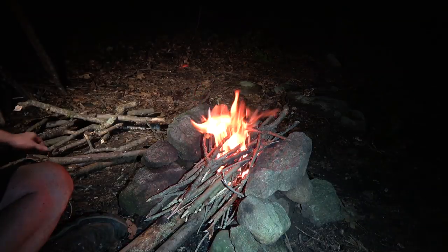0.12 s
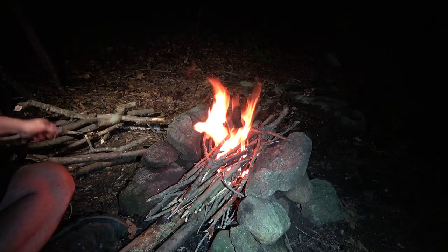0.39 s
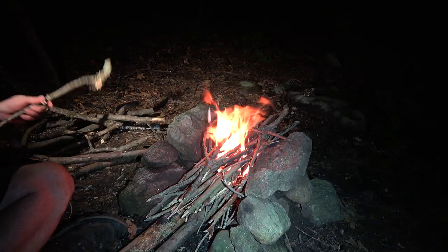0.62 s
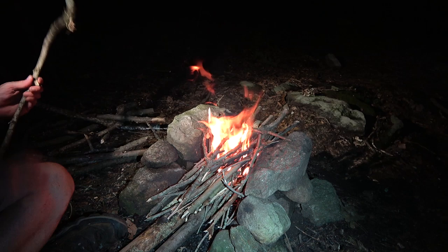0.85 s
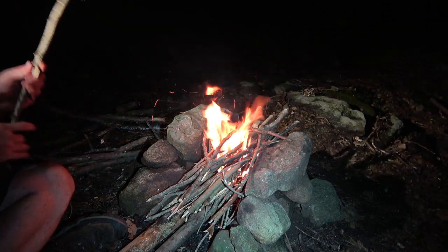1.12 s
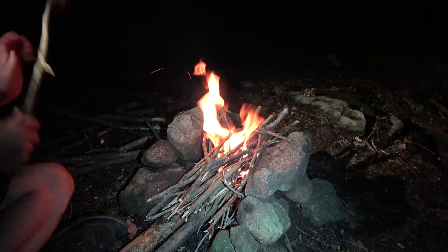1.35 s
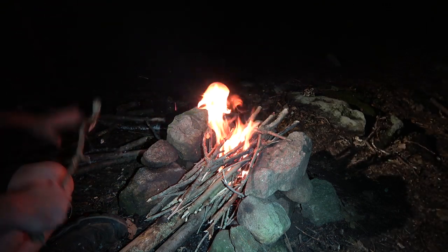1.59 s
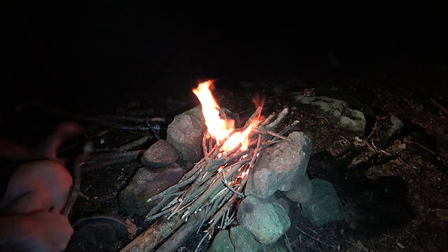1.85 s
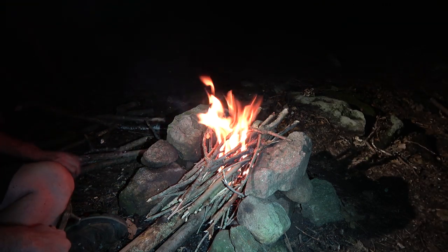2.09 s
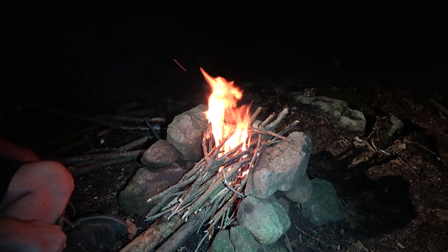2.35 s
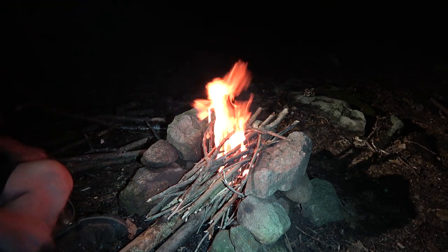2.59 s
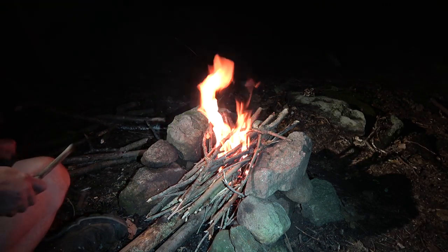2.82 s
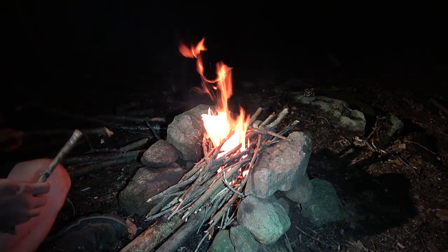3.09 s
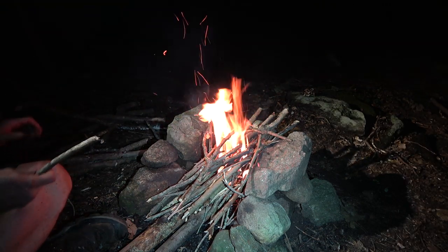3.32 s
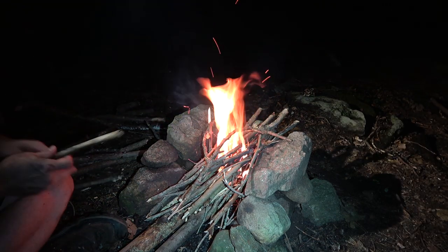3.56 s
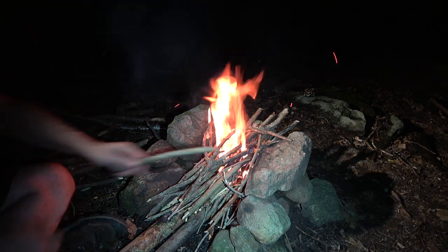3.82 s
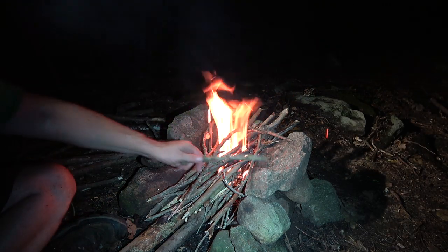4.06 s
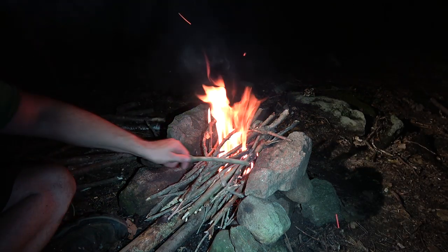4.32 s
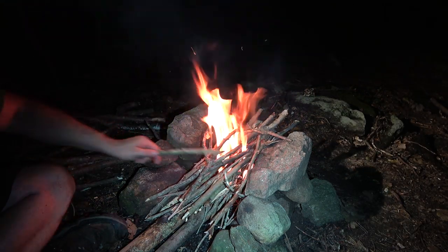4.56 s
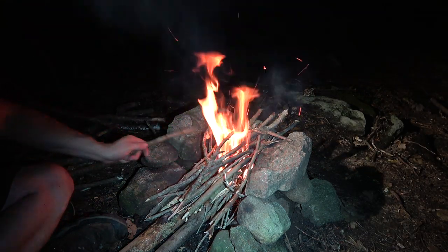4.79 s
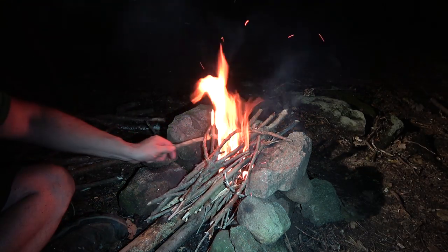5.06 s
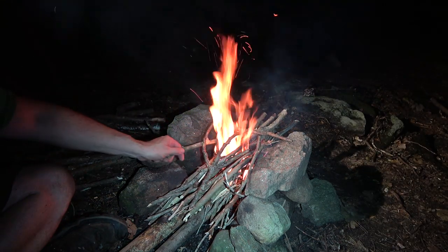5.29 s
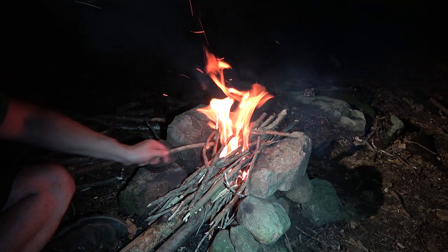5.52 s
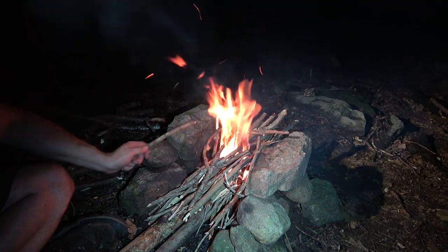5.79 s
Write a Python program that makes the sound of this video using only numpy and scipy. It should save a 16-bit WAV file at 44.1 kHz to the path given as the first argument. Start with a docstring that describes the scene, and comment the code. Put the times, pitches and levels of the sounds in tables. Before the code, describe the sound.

A small campfire of dry twigs outdoors among trees at night, heard close in mono. Throughout, flames make a very quiet, uneven low rumble under faint steady hiss, with sparse tiny ember ticks. Light rustle at 0.35-0.45 s and soft knocks precede a strong, bright pop at 0.84 s. Barely audible short chirps and a brush of twigs come around 1.15 s, then it is almost still. Small ticks and a scrape at 2.3-2.4 s lead to the dominating event at 2.65 s: a stick broken by hand, an explosive dry crack with a low thump, a woody knock at 2.73 s and a bright diffuse echo from the trees fading over half a second. A thin high snap follows at 3.04 s, a weaker one at 3.27 s, a dull knock at 3.36 s. From 4.2 to 5.5 s faint crackles and dry rustles cluster as the stick pokes the fire. A duller, moderate pop with a knock closes at 5.87 s.

```python
"""Dry twigs burst with sharp pops in a small fire, outdoors among trees at night: each is a pressure step
and a burst of splitting fibres, scattered by a ring of stones and echoed by the trees as decaying noise.
Sticks knock beside the fire as puffs of low noise; twigs and leaves rustle as clumped tiny clicks.
There are a few short tone chirps; the flames rumble as uneven low noise over the steady hiss of the night."""
import sys
import numpy as np
from scipy import signal
from scipy.fft import rfft, irfft
from scipy.io import wavfile

SR = 44100
rng = np.random.default_rng(int(sys.argv[2]) if len(sys.argv) > 2 else 0)


def materialize(psi):
    """Save the field psi as 16-bit PCM at rate SR to the path in sys.argv[1].

    A 1-D psi becomes a single channel; in a 2-D psi each row is a channel.
    """
    bounded = np.clip(np.atleast_2d(psi).T, -1, 1)
    quanta = np.round(bounded * 32767).astype(np.int16)
    wavfile.write(sys.argv[1], SR, quanta)


def nominal_scale(level):
    """Amplitude ratio for a level in decibels (scalar or array-like)."""
    x = np.asarray(level, float) / 20
    return 10 ** x


N = 260631

# Pops and snaps of bursting twigs. Each row: start in seconds, level in dB per half octave at the
# strongest frequency (energy referred to 6 ms), that frequency in Hz, fall below it in dB/octave,
# fall above it in dB/octave.
POP_EVENTS = [(0.3377, -72.5, 5920.0, 9, 4), (0.5705, -74, 9280.0, 15.0, 15.0), (0.8364, -28, 5760, 6.5, 6),
              (1.083, -67.5, 9280.0, 3, 7), (2.0366, -57.5, 7410.0, 3.5, -2), (2.2424, -69, 1540.0, 0, 2.5),
              (2.3067, -59, 5900, 7, 13.5), (2.3369, -59, 5920.0, 1, 9.0), (2.3744, -58.1, 1710, 11, 7),
              (2.5986, -65.5, 2410.0, 3.5, 2), (2.6084, -68.5, 7410.0, 0.5, 5.5),
              (2.6455, -13, 5080, 6, 6.0), (2.918, -56.5, 3380.0, 5.5, 2.5), (3.041, -31.4, 9350, 4, 12.5),
              (3.2653, -43.5, 8290.0, 5.5, 6.5), (3.356, -53, 507, 2, 2), (3.478, -70.5, 13000.0, 1, 7),
              (3.7547, -71.5, 13000.0, 12.0, 6.0), (4.195, -69.5, 2400, 17.5, 2.5),
              (4.3074, -58, 7450, 11, 32), (4.3633, -69, 5000, 4, 2), (4.3705, -62, 8290.0, 11, 0),
              (4.4767, -54.5, 13000.0, 6, -2), (4.5837, -73, 8980, 9, 4), (4.6164, -47.5, 7410.0, 2, 6.0),
              (4.735, -70.5, 12000, 5, 1), (4.911, -75, 9000, 7.5, 3), (4.97, -73, 6000, 2.5, 5),
              (4.9841, -59, 1927, 11, 2.5), (5.0162, -71, 6000, 7, 5), (5.0241, -59.6, 3380.0, 7.5, 3),
              (5.0302, -62, 3020.0, 12, 4.5), (5.0699, -57, 2150.0, 4.5, 6.5),
              (5.0908, -60.5, 2410.0, 8, -0.5), (5.1026, -65, 8400, 5.5, 9), (5.1071, -53.5, 8250, 7, 5),
              (5.1618, -55.5, 10380.0, 5, 13.5), (5.2734, -71.4, 3010, 8, 0.5),
              (5.358, -68.5, 11650, 5.5, 5), (5.7149, -65, 4730.0, 10, 0.5), (5.8726, -43, 2424, 9, 5.5)]


def pops(top_fall_db=2.5, stones_db=-16, stones_t60=0.071, boom_db=-1.0, boom_t60=0.052,
         fall_db=17.5, shelter_db=-8):
    """Impulsive fracture: a pressure step, fibres splitting for a few ms, then scatter from stones and ground.
    Also gives the bare strength of each pop, which wakes the echo."""
    out, strength, size = np.zeros(N), np.zeros(N), 4096
    step_height, split_ms, split_t60 = 4.2, 1.6, 0.007   # t60 in seconds
    rows = np.vstack([POP_EVENTS, ticks()])
    t = np.arange(size) / SR
    level, loudest = rows[:, 1:2], rows[:, 1].max()
    noise = rng.standard_normal((len(rows), size))

    # the fibres split evenly at first, then die away
    push = noise * nominal_scale(-60 * np.maximum(t - split_ms / 1000, 0) / split_t60)
    # strong ones start with a step; faint or dull ones scrape in
    sharp = np.clip((level + 68) / 18, 0, 1) * (rows[:, 2:3] > 1000)
    push[:, :3] = np.array([-1, 2, 1]) * step_height * sharp
    # stones scatter only short waves, and the broken stick scatters most
    scatter_db = stones_db - 5.4 * (level < loudest)
    push += band(noise, 1500, 18000) * nominal_scale(scatter_db - 60 * t / stones_t60)
    # the lows ring on in the pile
    push += band(noise[:, ::-1], 60, 600) * nominal_scale(boom_db - 60 * t / boom_t60)

    hz = np.maximum(np.fft.rfftfreq(size, 1 / SR), 1)
    edges = 64 * 2 ** np.arange(0, 8.5, 0.5)   # half octaves
    centres = np.sqrt(edges[1:] * edges[:-1])
    for (s, top_db, top_hz, below_db, above_db), burst in zip(rows, rfft(push)):
        power = [np.sum(np.abs(burst[(hz >= a) & (hz < b)]) ** 2) for a, b in zip(edges, edges[1:])]
        have_db = 10 * np.log10(np.array(power) * 2 / size / (0.006 * SR))
        octaves = np.log2(centres / top_hz)
        want_db = top_db - np.where(octaves < 0, -below_db, above_db) * octaves
        bright = nominal_scale(want_db[(centres > 2000) & (centres < 8000)]).mean(keepdims=True) * 2
        # small twigs push little bass
        want_db -= fall_db * np.maximum(np.log2(350 / centres), 0)
        want_db -= top_fall_db * np.maximum(np.log2(centres / 11000), 0)
        gain = nominal_scale(np.interp(np.log(hz), np.log(centres), want_db - have_db))
        add(out, s, irfft(burst * causal(gain)))
        # the loudest is a stick broken by hand in the open; the stones shelter the rest from the trees
        add(strength, s, bright * nominal_scale(shelter_db * (top_db < loudest)))
    return port(out), strength


def ticks(low_hz=5000, high_hz=13000, fall_db=4.5):
    """A random point process: rows like those of the pops for thin, faint ticks of the embers."""
    per_s, least_db, spread_db = 1.7, -73, 0.5
    when, size, pitch = rng.random((round(per_s * N / SR), 3)).T
    level = least_db - spread_db * np.log(1 - 0.95 * size)
    top_hz = low_hz * (high_hz / low_hz) ** pitch
    return np.c_[when * N / SR, level, top_hz, np.full((len(when), 2), fall_db)]


# Echo from the trees. Each row: frequency in Hz, level in dB relative to the pop, t60 in seconds.
TREE_ECHO = [(400, -47, .5), (1000, -41.5, 0.24), (2270, -33.5, 0.92), (3470, -23, 0.49),
             (5500, -25.5, 0.75), (7933, -25, 0.47), (13000, -28.5, .6)]


def trees(x, onset_s=0.0054):
    """Diffuse reverberation: many scattered echoes make noise that dies away at a rate set band by band."""
    t = np.arange(round(0.8 * SR)) / SR
    edges = 280 * 2 ** np.arange(0, 6, 0.5)
    white, echo = rng.standard_normal((2, len(t))), 0
    for k, (low, high) in enumerate(zip(edges, edges[1:])):
        db, t60 = at_hz(TREE_ECHO, np.sqrt(low * high))
        echo = echo + nominal_scale(db - 60 * t / t60) * band(white[k % 2], low, high)
    return signal.fftconvolve(x, echo * (1 - np.exp(-t / onset_s)))[:N]


# Resonances of the microphone's port. Each row: frequency in Hz, width in Hz, gain in dB.
PORT_RESONANCES = [(5510, 1200, 2.0), (9100, 2000, 5), (10700, 2800, -5), (12754, 2500, 1)]


def port(x):
    """Cavity resonance: the port of the microphone colours the sound with peaks and a dip."""
    return peaks(x, PORT_RESONANCES)


# Dull knocks of sticks on the ground and in the pile. Each row: start in seconds, peak of the low part
# in dB, peak of the grit in dB relative to it, time constant of the fall in ms.
KNOCK_EVENTS = [(0.589, -57, -21, 6.5), (0.733, -58.5, -14, 5.9), (0.85, -59, -20, 14),
                (1.29, -58, -18.5, 6.8), (1.902, -56.5, -10, 32), (2.344, -52.5, 0, 13),
                (2.379, -59.5, 4, 25), (2.647, -26, -26, 4.4), (2.727, -35, -3, 12), (2.753, -53.5, 8, 7.4),
                (3.044, -50.5, -14, 9), (3.355, -40, -5.5, 12.5), (3.384, -56, -13, 13),
                (3.489, -56.5, -7.5, 9.6), (3.564, -52, -18, 8), (3.637, -51.5, -15, 6.6),
                (4.945, -56.5, -2, 6.4), (4.961, -62, -16.5, 8.8), (5.096, -56.5, -1, 10),
                (5.325, -65, -6.5, 14), (5.873, -42.5, -15, 3)]


def knocks():
    """Soft impact: a yielding contact gives a short puff of low noise with a little grit above."""
    out, t = np.zeros(N), np.arange(round(0.08 * SR)) / SR
    noises = rng.standard_normal((len(KNOCK_EVENTS), len(t)))
    for (s, peak_db, grit_db, fall_ms), noise in zip(KNOCK_EVENTS, noises):
        puff = noise * (1 - np.exp(-t / 0.001)) * np.exp(-t * 1000 / max(fall_ms, 1))
        low = band(band(puff, 230, 900), 230, 600)
        grit = band(puff * np.exp(-t / 0.024), 1000, 1550)
        knock = low / np.abs(low).max() + nominal_scale(grit_db) * grit / np.abs(grit).max()
        add(out, s, nominal_scale(peak_db) * knock)
    return out


# Brief pitched chirps. Each row: start in seconds, frequency in Hz, peak level in dB, length in ms.
CHIRP_EVENTS = [(1.141, 2110, -62, 9.1), (1.161, 5900, -58, 7.3), (1.181, 5900, -56, 8.0),
                (1.312, 2320, -68, 22.0), (4.749, 3310, -57, 4.9)]


def chirps():
    """Windowed sinusoids: short tone bursts of steady pitch that swell and fade smoothly."""
    out = np.zeros(N)
    for s, hz, db, length_ms in CHIRP_EVENTS:
        t = np.arange(round(length_ms * SR / 1000)) / SR
        add(out, s, nominal_scale(db) * np.hanning(len(t)) * np.sin(2 * np.pi * hz * t))
    return out


# Strokes of twigs and leaves rubbing. Each row: time of the peak in seconds, nominal level in dB,
# swell in dB/s, fade in dB/s, centre of the scrape in Hz.
RUSTLE_STROKES = [(0.345, -72, 100, 600, 5000), (0.41, -68.5, 350, 182, 5200), (1.155, -66, 400, 255, 5850),
                  (1.76, -70, 57, 80, 2080), (2.344, -60.5, 1200, 1500, 3260), (2.383, -62, 157, 278, 3896),
                  (3.377, -60.5, 1500, 700, 3300), (4.25, -79, 900, 100, 6000),
                  (4.297, -56.5, 302, 350, 5440), (4.335, -71, 399.5, 499, 7400),
                  (4.375, -64, 703.5, 173, 8000), (4.425, -83, 300.5, 302, 7000),
                  (4.46, -61, 700, 500, 5600), (4.526, -72, 150, 499.5, 6800),
                  (4.59, -73.5, 500, 500, 6200), (4.952, -75, 200, 898, 4800),
                  (4.992, -60.5, 800, 900, 5100), (5.026, -86, 400, 800, 5580),
                  (5.112, -66, 700, 900, 6180), (5.169, -67.5, 250.5, 350, 7000),
                  (5.246, -70.5, 277, 259, 7130), (5.365, -72.5, 121, 600, 7060),
                  (5.48, -68, 330.5, 500, 6310)]
# Spectrum of the rubbing before each stroke's own centre. Each row: frequency in Hz, relative dB per Hz.
RUSTLE_SPECTRUM = [(350, -36), (600, -2.5), (846, -14.5), (1490, 2), (2610, -4), (5330, -6.5), (6640, -7.5),
                   (8390, -1), (10600, -15), (13000, -7), (16000, -20)]


def rustle(spread_db=6.0, patchy_db=3.5, skirt_db=4.5):
    """Stick-slip friction: clumped tiny clicks; each stroke swells and fades around a centre of its own."""
    t = np.arange(N) / SR
    level, pull = 1e-9, 5e-6   # pull / level is the current centre, 5000 Hz at rest
    for s, db, swell, fade, hz in RUSTLE_STROKES:
        drop_db = np.where(t < s, swell * (s - t), fade * (t - s))
        stroke = nominal_scale(np.maximum(db - drop_db, -160))
        level, pull = level + stroke, pull + stroke * hz
    centre_hz = pull / level

    per_s, clump_db = 9000, 2.5
    born = rng.random((2, N)) < per_s / SR
    sizes = nominal_scale(spread_db * np.minimum(rng.exponential(1, (2, N)), 4))
    grains = born * sizes * rng.choice([-1, 1], (2, N))
    clumps = clump_db * drift(60)

    def colour_db(hz):
        """Spectral tilt: bands weaken away from the centre, and flicker together and singly."""
        return -skirt_db * np.abs(np.log2(hz / centre_hz)) + clumps + patchy_db * drift(33)

    return level * rms_one(banded(grains + 1e-18, RUSTLE_SPECTRUM, colour_db))


# Loudness of the flames. Each row: time in seconds, nominal level in dB.
FLAME_LEVEL = [(0.0, -57.5), (0.23, -63.5), (2.26, -62.5), (2.81, -59), (3.11, -64), (3.75, -59),
               (4.3, -63), (5.91, -61.5)]
# Spectrum of the flames. Each row: frequency in Hz, relative dB per Hz.
FLAME_SPECTRUM = [(13, -33), (22, -6), (49, 5.5), (81, -3.5), (113, -1.5), (223, -7.5), (434, -22.5),
                  (700, -21), (910, -43.5), (1540, -120)]


def flame(puffs_db=2.5, patchy_db=1.8):
    """Turbulent combustion: low noise in uneven puffs with small quick flutters."""
    flutter = puffs_db * (drift(16) + 0.5 * drift(4))

    def puff_db(hz):
        """Turbulent modulation: a shared flutter, weaker below 200 Hz, and a drift of each band's own."""
        return flutter * min(hz / 200, 1) + patchy_db * drift(23)

    roar = banded(rng.standard_normal((2, N)), FLAME_SPECTRUM, puff_db)
    return nominal_scale(in_time(FLAME_LEVEL)[0]) * rms_one(roar)


# Spectrum of the hiss. Each row: frequency in Hz, relative dB per Hz.
HISS_SPECTRUM = [(180, -25), (300, -8), (373, 3), (426, -15.5), (692, -14), (905, -7.5), (5990, -20.5),
                 (7200, -22.5), (14300, -28.5), (16400, -37)]
# Steady stronger and weaker bands in the hiss. Each row: frequency in Hz, width in Hz, gain in dB.
HISS_PEAKS = [(5900, 370, 7.5), (8500, 750, 6), (10800, 1900, -6.5), (12500, 820, 7)]


def hiss(level_db=-70, waver_db=1.3):
    """Stationary broadband noise: the hiss of night air and electronics, wavering slightly."""
    air = banded(rng.standard_normal((2, N)), HISS_SPECTRUM, lambda hz: 0.4 * drift(4))
    return nominal_scale(level_db + waver_db * drift(1.3)) * rms_one(peaks(air, HISS_PEAKS))


def in_time(rows):
    """Linear interpolation: joins curve rows by straight lines, one value a sample."""
    s, *columns = np.transpose(rows)
    return [np.interp(np.arange(N) / SR, s, c) for c in columns]


def at_hz(points, hz):
    """Logarithmic interpolation: reads a table on a log-frequency axis."""
    points = np.array(points)
    return [np.interp(np.log(hz), np.log(points[:, 0]), c) for c in points.T[1:]]


def rms_one(x):
    """Power normalisation: scales to rms 1."""
    return x / np.sqrt(np.mean(x ** 2) + 1e-20)


def band(x, low_hz, high_hz):
    """Band-pass filtering with a Butterworth response."""
    return signal.sosfilt(signal.butter(2, [low_hz, high_hz], "band", fs=SR, output="sos"), x)


def add(out, s, sound):
    """Superposition: mixes a sound in at a time in seconds."""
    i = round(s * SR)
    out[i:i + len(sound)] += sound[:N - i]


def drift(rate_hz):
    """Low-pass random process: smooth noise of rms 1, made at every 40th sample and interpolated."""
    r = np.exp(-80 * np.pi * rate_hz / SR)
    white = rng.standard_normal(N // 40 + 2002)
    slow = signal.lfilter([1], [1, -2 * r, r * r], white)[2000:]   # the filter settles first
    return np.interp(np.arange(N) / 40, np.arange(len(slow)), rms_one(slow))


def banded(source, spectrum, gain_db):
    """Subband synthesis: third octaves of two unrelated sources in turn, each with its level and moving gain."""
    out, edges = 0, spectrum[0][0] * 2 ** np.arange(0, 10, 1 / 3)
    edges = edges[edges < min(spectrum[-1][0] * 1.1, 18000)]
    for k, (low, high) in enumerate(zip(edges, edges[1:])):
        hz = np.sqrt(low * high)
        gain = nominal_scale(at_hz(spectrum, hz)[0] + gain_db(hz))
        out = out + gain * band(source[k % 2], low, high)
    return out


def peaks(x, table):
    """Second-order resonance: a chain of peak and dip filters."""
    for hz, width_hz, db in table:
        w = 2 * np.pi * hz / SR
        a, g = np.sin(w) * width_hz / hz / 2, nominal_scale(db / 2)
        zeros = [1 + a * g, -2 * np.cos(w), 1 - a * g]
        poles = [1 + a / g, -2 * np.cos(w), 1 - a / g]
        x = signal.lfilter(zeros, poles, x)
    return x


def causal(gain):
    """Minimum phase: gives a gain curve the phase with the least delay, by folding its cepstrum."""
    c = irfft(np.log(gain))
    half = len(c) // 2
    return np.exp(rfft(np.r_[c[0], 2 * c[1:half], c[half], np.zeros(half - 1)]))


def scene():
    """Superposition of fire, sticks, echo and night."""
    cracks, strength = pops()
    echo = port(trees(strength))
    mix = cracks + echo + knocks() + chirps() + rustle() + flame() + hiss()
    return mix[None]


def band_limit(x):
    """A steep low-pass at the top of the band."""
    return signal.sosfilt(signal.butter(12, 16500, fs=SR, output="sos"), x)


def record(dry):
    """Band limiting and overload: the top is cut from 16600 Hz, and peaks past full scale are clipped."""
    low_pass = signal.cheby2(8, 40, 16600, fs=SR, output="sos")
    cut = signal.sosfilt(low_pass, dry)
    return band_limit(np.clip(cut, -1, 1))


dry = scene()
out = record(dry)
materialize(out)
```